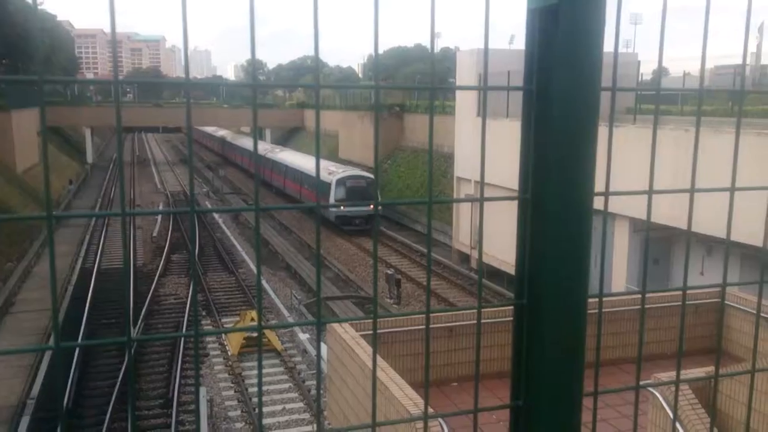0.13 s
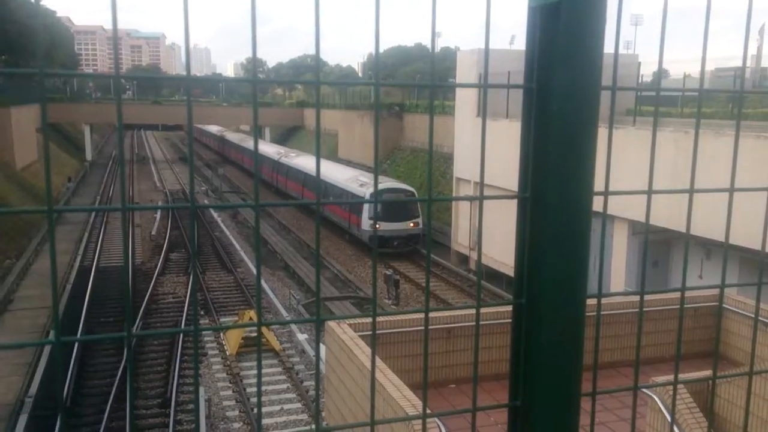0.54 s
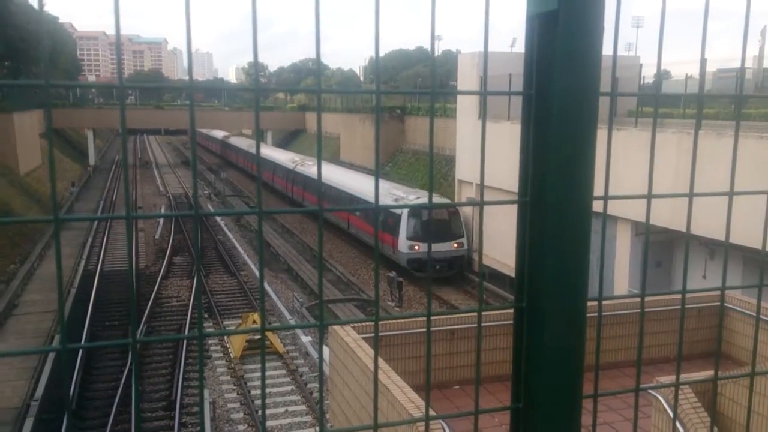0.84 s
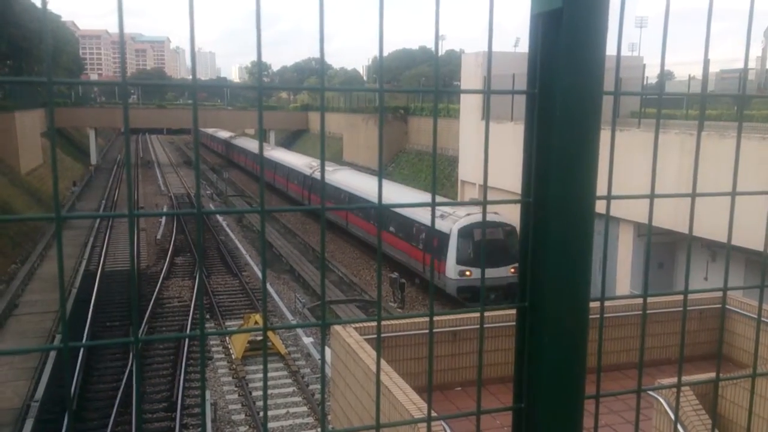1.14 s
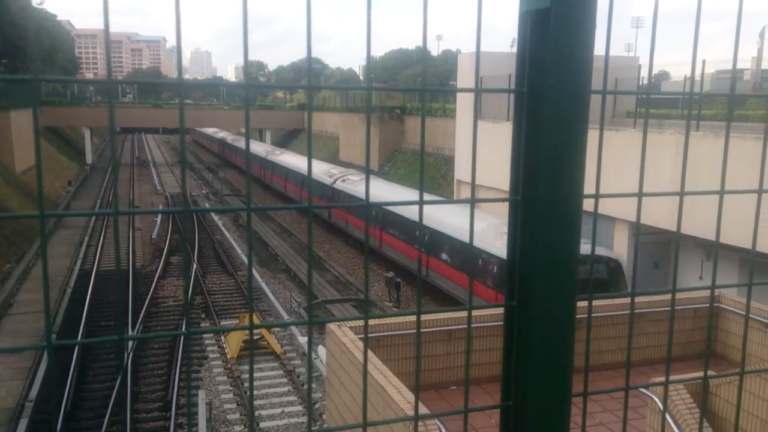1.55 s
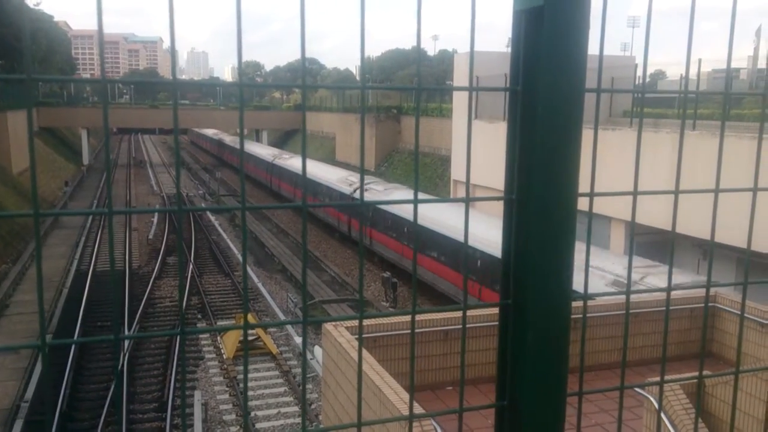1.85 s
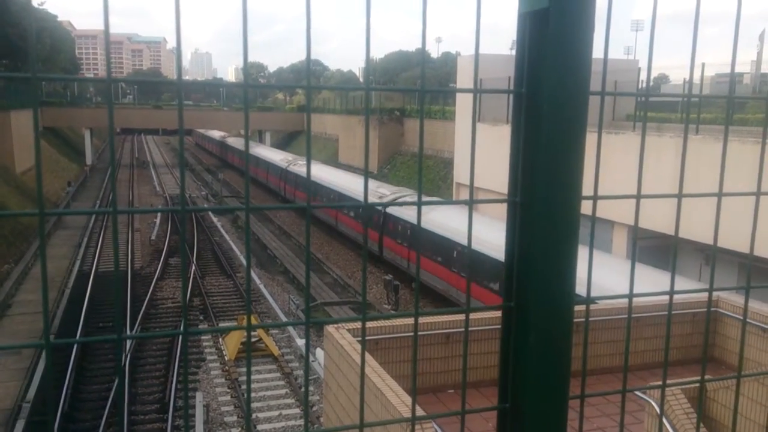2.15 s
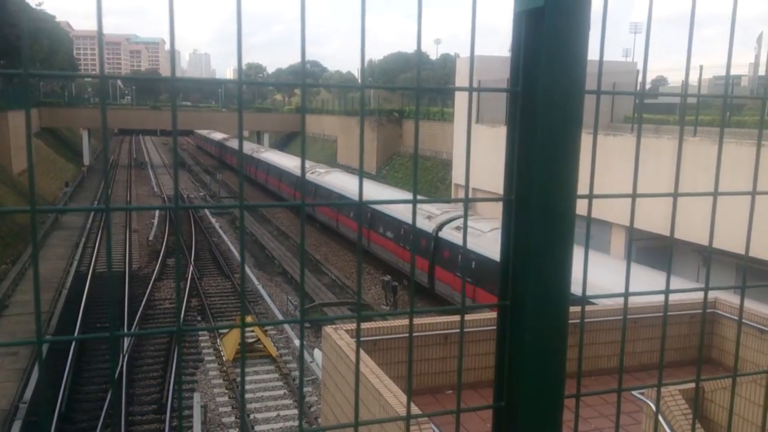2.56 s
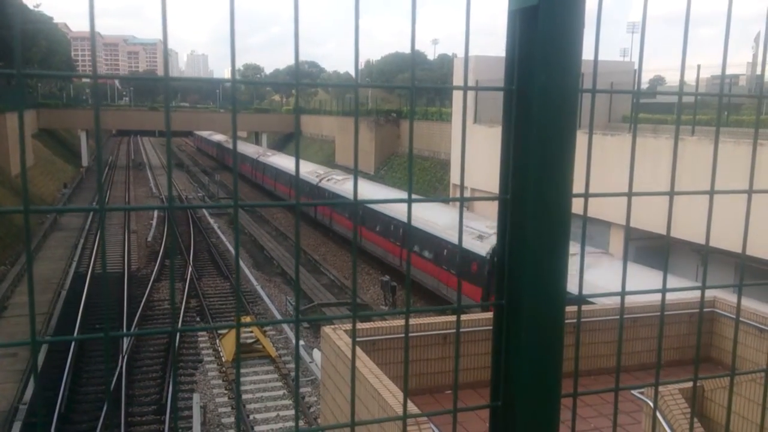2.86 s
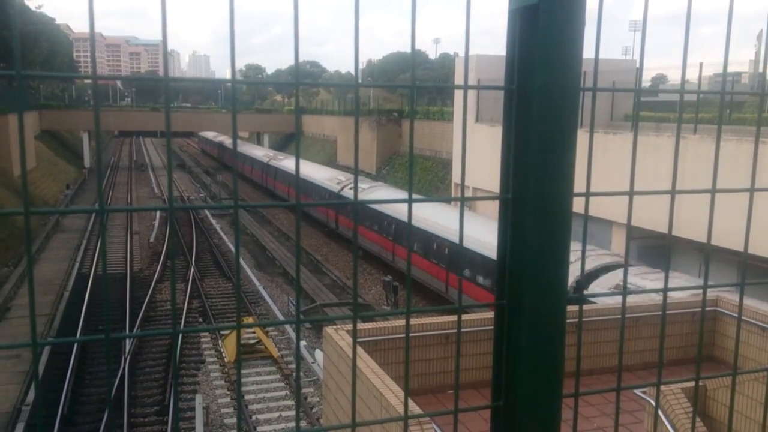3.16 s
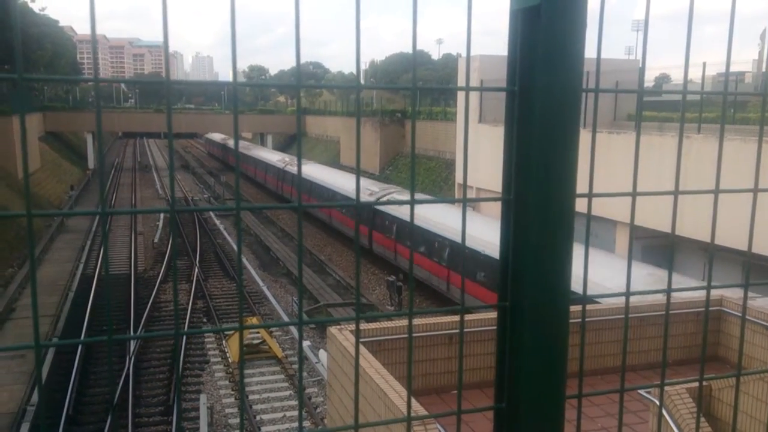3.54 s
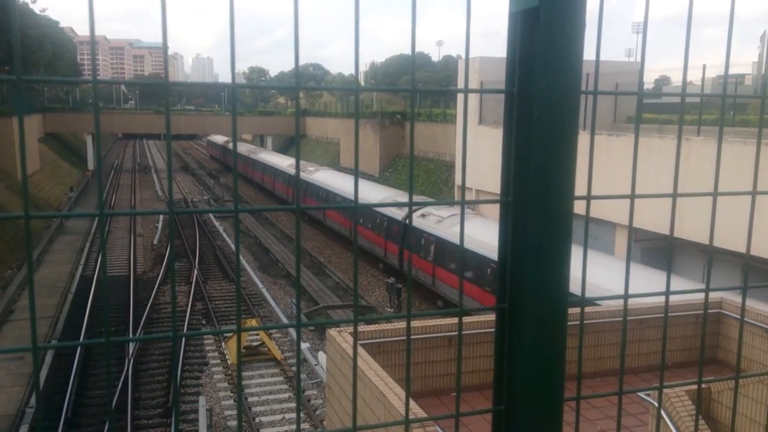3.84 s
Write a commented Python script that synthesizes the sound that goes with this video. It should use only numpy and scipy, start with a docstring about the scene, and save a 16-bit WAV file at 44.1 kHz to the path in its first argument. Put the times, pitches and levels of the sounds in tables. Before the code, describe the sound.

A metro train rolls past with roaring wheels, a low rumble and knocks over a joint.

```python
"""Metro train below a fence

Stereo microphone at the fence; the sound cuts in abruptly as a train leaves a cutting to the right.
Wheels roar on the rails, rail ripple sings a sinking note, axle pairs knock over a joint, cars rumble.
The bright roar drops as the front goes behind a wall, while the hiss swells for a moment."""
import sys
import numpy as np
from scipy import signal
from scipy.fft import rfft, irfft
from scipy.io import wavfile

SR = 44100
rng = np.random.default_rng(int(sys.argv[2]) if len(sys.argv) > 2 else 0)


def to_wav(sig):
    """Store sig (one row per channel, or 1-D mono) as 16-bit WAV at the path in sys.argv[1].

    Samples outside -1..1 are clipped; the rate is SR.
    """
    pcm = np.clip(np.atleast_2d(sig), -1, 1) * 32767
    pcm = np.round(pcm).astype(np.int16)
    wavfile.write(sys.argv[1], SR, pcm.T)  # frames by channels


N = 176400

# rolling noise at the fence: t/s, then relative level/dB of roar, rush, hiss, top
ROLLING_LEVELS = [(0.4, -43.5, -55, -62, -76), (0.74, -44.5, -53, -60.5, -73.5),
                  (1.1, -42, -52.5, -61.5, -72.5), (1.48, -43.5, -52.5, -61, -72),
                  (1.58, -47, -55, -58.5, -71), (2.35, -49.5, -58.5, -66, -78),
                  (3.08, -50.5, -59.5, -64.5, -73), (3.38, -51.5, -60.5, -68.5, -79),
                  (3.47, -51.5, -57.5, -66, -75), (4, -52, -58, -69, -77.5)]
# spectra of those four bands: f/Hz, relative level/dB
ROAR_SPECTRUM = [(400, -17.5), (850, -2.5), (1150, 0), (1600, -1), (2100, -2), (2700, -8.5), (3500, -15.5),
                 (6000, -37.5), (14000, -78)]
RUSH_SPECTRUM = [(1800, -7), (3000, 0.5), (3700, -0.5), (4500, 0.5), (5300, -9), (6200, -11), (8000, -31),
                 (14000, -65)]
HISS_SPECTRUM = [(4000, -29), (5700, -8), (6500, -2), (7200, 1.5), (7800, -1.5), (8600, -9), (11000, -28),
                 (14000, -55)]
TOP_SPECTRUM = [(7000, -20), (9000, 4), (10200, 5.5), (12000, -1.5), (13300, -7.5), (14200, -19),
                (15000, -36)]
# rail ripple: t/s, near wheels f/Hz, near wheels level/dB, far wheels level/dB
RIPPLE_NOTE = [(.4, 765.1, -54, -39), (.8, 764.5, -54, -40), (1.0, 780, -55, -36),
               (1.45, 763.7, -43.5, -39.5), (1.69, 759.5, -51, -49), (1.78, 758, -41.5, -46),
               (1.91, 703, -48.5, -51), (2.02, 706, -39, -44.5), (2.2, 697.6, -43, -46.5),
               (2.5, 704, -43.5, -46), (2.85, 711.2, -41.5, -45.5), (3.08, 679, -38.5, -52),
               (3.4, 679, -37.5, -43), (3.55, 670.8, -41.5, -50.5), (3.8, 655, -38, -48),
               (4, 646, -40.5, -49)]
# passing cars: t/s, rumble level/dB, body level/dB
CAR_LEVELS = [(.4, -42.5, -41.5), (.75, -39, -40), (1.1, -38, -38), (1.5, -39.5, -39), (1.7, -42.5, -44),
              (2.0, -41.5, -42), (2.5, -40, -42), (3.1, -45.5, -42), (3.65, -38, -40), (4, -44.5, -42)]
# spectra of car rumble, drumming body and joint knock: f/Hz, relative level/dB
RUMBLE_SPECTRUM = [(10, -23), (25, 4), (45, -1), (68, 1.5), (88, -8), (120, -9), (170, -17.5), (500, -63)]
BODY_SPECTRUM = [(60, -26), (130, -7.5), (240, -4), (330, -1.5), (420, 2), (600, -0.5), (900, -4),
                 (1150, -15.5), (2800, -72)]
KNOCK_SPECTRUM = [(30, -6), (70, 2), (125, -0.5), (195, -1.5), (280, -6), (450, 0.5), (800, -12),
                  (1200, -20.5), (2300, -20), (4200, -25), (8000, -39), (15000, -75)]
# axles over the rail joint: t/s, relative level/dB of knock and of thud
AXLE_CROSSINGS = [(.961, 0.5, 1.5), (1.114, -2.5, 2), (1.251, -1, -1.5), (1.405, -0.5, -1),
                  (1.944, -6.5, -2.5), (2.103, -2, -4.5), (2.244, -5, -2), (2.403, -1, 6.5),
                  (2.552, -2.5, -4), (2.858, -7, -7.5), (3.445, -3, 0.5), (3.598, -4, -1.5), (3.921, -4, 0)]
# running gear clanks: t/s, f/Hz, peak level/dB
GEAR_CLANKS = [(.998, 770, -21.5), (1.155, 560, -28), (1.174, 554, -26.5), (2.018, 680, -27),
               (2.39, 555, -28), (3.458, 688, -29)]
# flange rasps: t/s, centre f/Hz, level/dB
FLANGE_RASPS = [(1.025, 2058, -41), (2.44, 2180, -42.5), (2.64, 2610, -48), (3.485, 2440, -46),
                (3.94, 4550, -52)]
# high wheel ring: t/s, level/dB
WHEEL_RING_LEVELS = [(1.4, -76), (1.55, -56), (1.72, -60), (1.86, -60), (2.05, -63), (2.3, -76)]
# spectrum of the sizzle: f/Hz, relative level/dB
SIZZLE_SPECTRUM = [(8000, -14), (10500, 2), (15000, -1)]
# likeness of the two microphone ports: f/Hz, coherence/0-1
PORT_COHERENCE = [(25, 0.45), (70, 0.48), (140, 0.97), (280, 1), (450, 0.9), (720, 0.65), (1000, 1),
                  (1250, 0.32), (4800, 0.27), (7000, 0.074)]
# left port against right: f/Hz, level/dB
LEFT_SHADING = [(60, -5.5), (200, -5), (400, -6), (700, -5), (950, -5), (1200, -13), (2200, -14),
                (4300, -11), (5700, -4.5), (7300, -16.5), (10000, -12), (12000, -8), (13500, -1)]
# left port behind right: f/Hz, lag/s
LEFT_LAG = [(80, .0008), (260, .00022), (430, .0002), (640, .00027), (1100, .00015), (1550, .00027),
            (3000, .00041)]

TIME = np.arange(N) / SR
BIN_HZ = np.arange(N // 2 + 1) * SR / N


def undb(db):
    return 10 ** (np.asarray(db) / 20)


def curve(table, column):
    """One column of a table, joined by straight lines in time."""
    rows = np.array(table)
    return np.interp(TIME, rows[:, 0], rows[:, column])


def per_bin(points):
    """Points joined on a log-frequency axis."""
    hz, value = np.array(points).T
    return np.interp(np.log(np.maximum(BIN_HZ, 1)), np.log(hz), value)


def unit_rms(x):
    return x / np.sqrt(np.mean(x ** 2))


def noise(spectrum):
    """Two unrelated noises of one colour, rms 1."""
    white = rfft(rng.standard_normal((2, N)))
    return unit_rms(irfft(white * undb(per_bin(spectrum)), N))


def wander(rate_hz):
    """A smooth random drift, rms 1, strongest near rate_hz."""
    ratio = BIN_HZ / rate_hz
    return unit_rms(irfft(rfft(rng.standard_normal(N)) * ratio / (1 + ratio ** 3), N))


def resonance(hz, width_hz):
    """Two unrelated noises in a band around a steady or moving centre, rms 1."""
    lowpass = signal.butter(2, width_hz / 2, fs=SR, output="sos")
    slow = signal.sosfilt(lowpass, rng.standard_normal((2, 2, N)))
    phase = 2 * np.pi * np.cumsum(np.broadcast_to(hz, N)) / SR
    return unit_rms(slow[0] * np.cos(phase) + slow[1] * np.sin(phase))


def swell(at_s, spread_s):
    """A smooth rise and fall around one moment."""
    return np.exp(-.5 * ((TIME - at_s) / spread_s) ** 2)


def struck_note(at_s, hz, rise_cycles):
    """A sine whose envelope builds to 1 over rise_cycles and dies away."""
    cycles = np.maximum(TIME - at_s, 0) * hz
    return np.sin(2 * np.pi * cycles) * cycles / rise_cycles * np.exp(1 - cycles / rise_cycles)


def rolling():
    """Steel rolls on steel below the fence: four bands flutter together and flicker alone."""
    bands = (ROAR_SPECTRUM, 6.5), (RUSH_SPECTRUM, 6), (HISS_SPECTRUM, 5.5), (TOP_SPECTRUM, 5)
    flutter_db = 0.56 * wander(4.8)
    out = 0
    for column, (spectrum, gain_db) in enumerate(bands, start=1):
        level_db = gain_db + curve(ROLLING_LEVELS, column) + flutter_db
        out += noise(spectrum) * undb(level_db + 0.49 * wander(30))
    return out


def rail_ripple():
    """On rippled rail the nearest wheels sing a sinking note; those farther off blur into a band."""
    near_hz = curve(RIPPLE_NOTE, 1) * (1 + 0.0081 * wander(5.4))
    near = resonance(near_hz, width_hz=48.6) * undb(curve(RIPPLE_NOTE, 2))
    far = resonance(768.6, width_hz=263) * undb(curve(RIPPLE_NOTE, 3))
    return (near + far) * undb(0.62 * wander(28))


def cars():
    """Car bodies rumble and drum as the track jolts them."""
    jolt_db = 0.96 * wander(27)
    rumble = noise(RUMBLE_SPECTRUM) * undb(curve(CAR_LEVELS, 1) + 2.6 * wander(6.1))
    body = noise(BODY_SPECTRUM) * undb(curve(CAR_LEVELS, 2) + jolt_db)
    return rumble + body


def whine():
    """A thin whine, probably the drive, sinks as the front car passes the microphone."""
    passing_s, sag_hz_per_s = 1.65, 310
    hz = 5830 - sag_hz_per_s * (TIME - passing_s)
    return resonance(hz, width_hz=64) * undb(-68) * swell(passing_s, spread_s=0.91)


def boom():
    """A low, wavering note swells as the front car draws near."""
    hz = 67.6 + 3.3 * wander(6.9)
    note = unit_rms(np.sin(2 * np.pi * np.cumsum(hz) / SR))
    return note * undb(-42.5 + 2 * wander(7.4)) * swell(at_s=1.14, spread_s=0.18)


def rail_joint():
    """An axle's wheels hit the joint in turn: two dull knocks, each with a thud and a short rattle."""
    attack_s, knock_decay_s, rattle_decay_s = 0.0054, 0.0038, 0.047
    second_wheel_lag_s, second_wheel_db = 0.018, -7.5
    power, thuds = np.zeros(N), np.zeros(N)
    for start, knock_db, thud_db in AXLE_CROSSINGS:
        for at, wheel_db in ((start, 0), (start + second_wheel_lag_s, second_wheel_db)):
            age = np.maximum(TIME - at, 0)
            attack = np.minimum(age / attack_s, 1)
            decay = np.exp(-age / knock_decay_s) + undb(-3.5) * np.exp(-age / rattle_decay_s)
            power += (undb(knock_db + wheel_db) * attack * decay) ** 2
            thud_hz = 197 * (1 + 0.11 * rng.standard_normal())
            thuds += undb(thud_db + wheel_db) * struck_note(at, thud_hz, rise_cycles=0.52)
    knocks = undb(-30.5) * np.sqrt(power) * noise(KNOCK_SPECTRUM)
    return knocks + undb(-34) * np.array([thuds, np.zeros(N)])  # thuds take the direct path only


def clanks():
    """Jolted running gear rings briefly, heard by the direct path only."""
    rings = sum(undb(db) * struck_note(at, hz, rise_cycles=1.8) for at, hz, db in GEAR_CLANKS)
    return np.array([rings, np.zeros(N)])


def flanges():
    """Flanges brush the rail in short rasps."""
    return sum(resonance(hz, width_hz=650) * undb(db) * swell(at, spread_s=0.017)
               for at, hz, db in FLANGE_RASPS)


def wheel_ring():
    """The leading wheels ring in a high, metallic band as they go by."""
    return resonance(7220, width_hz=320) * undb(curve(WHEEL_RING_LEVELS, 1))


def sizzle():
    """A faint, very high sizzle goes by, perhaps a shoe on the power rail."""
    return noise(SIZZLE_SPECTRUM) * undb(-69) * swell(at_s=3.04, spread_s=0.13)


def scene():
    """The microphone's right port faces the train; the left hears it later, shaded, with reflections."""
    train = rail_ripple() + rolling() + cars() + rail_joint() + clanks()
    train += boom() + flanges() + wheel_ring() + whine()
    direct, scattered = rfft(train)
    coherence = np.clip(per_bin(PORT_COHERENCE), 0, 1)
    delay = np.exp(-2j * np.pi * BIN_HZ * per_bin(LEFT_LAG))
    left = coherence * delay * direct + np.sqrt(1 - coherence ** 2) * scattered
    return irfft(np.array([left * undb(per_bin(LEFT_SHADING)), direct]), N)


def record(dry):
    """The sound cuts in abruptly, and a steep low-pass takes off the highest treble."""
    cut_in_s, cutoff_hz = 0.383, 14900
    gate = np.where(TIME < cut_in_s, undb(-73), 1)
    lowpass = signal.ellip(8, .2, 80, cutoff_hz, fs=SR, output="sos")
    return signal.sosfilt(lowpass, dry * gate)


dry = scene()
out = record(dry)
to_wav(out)
```